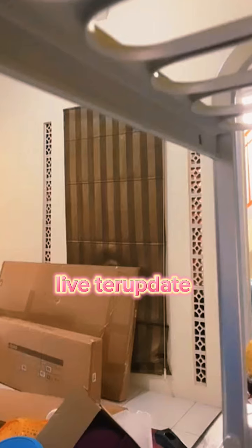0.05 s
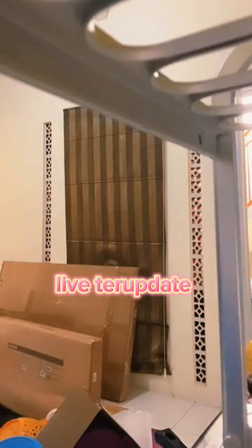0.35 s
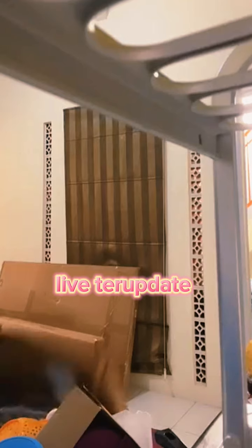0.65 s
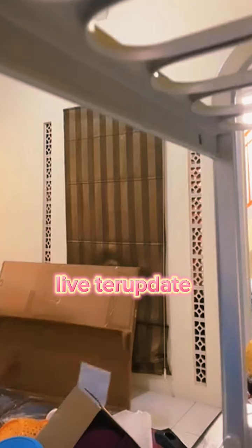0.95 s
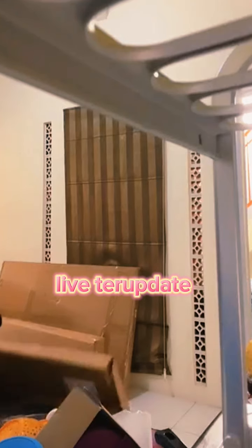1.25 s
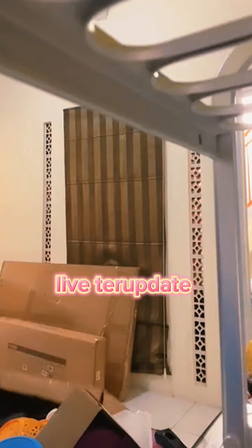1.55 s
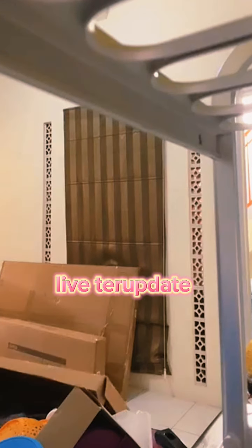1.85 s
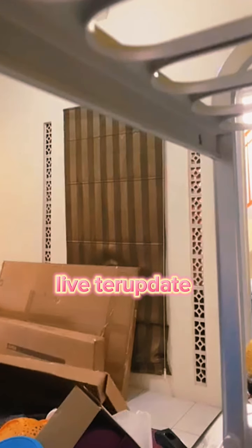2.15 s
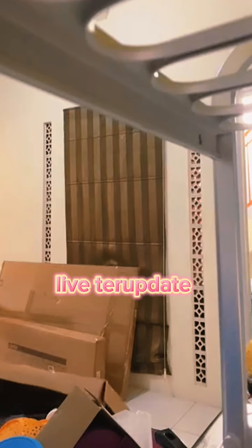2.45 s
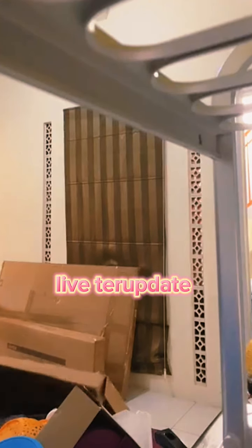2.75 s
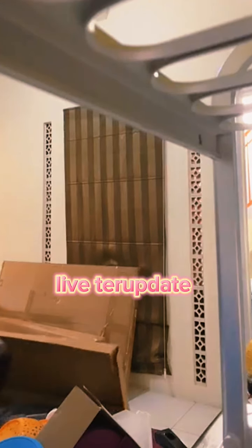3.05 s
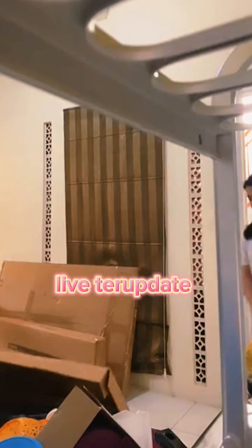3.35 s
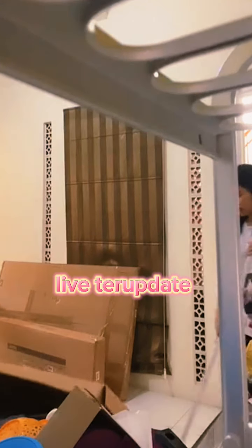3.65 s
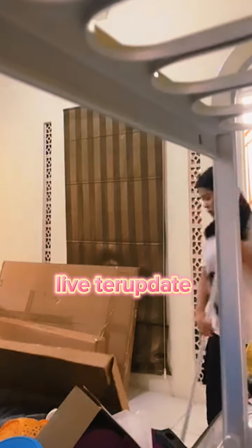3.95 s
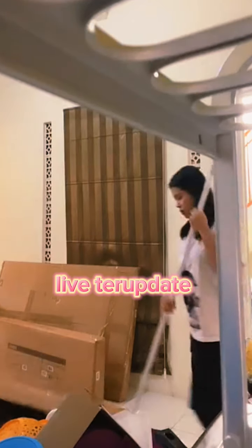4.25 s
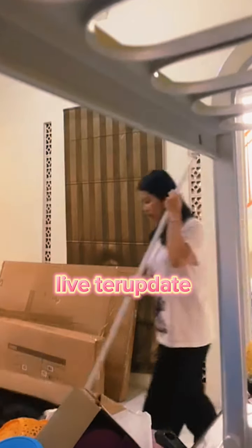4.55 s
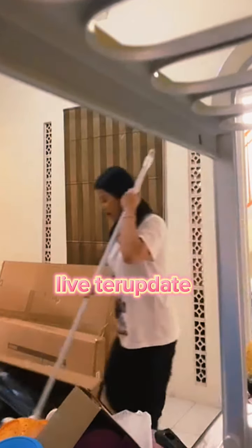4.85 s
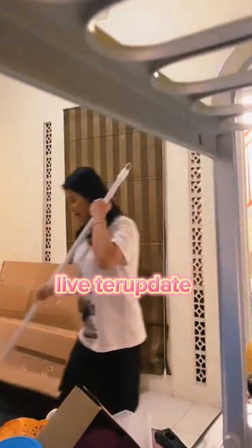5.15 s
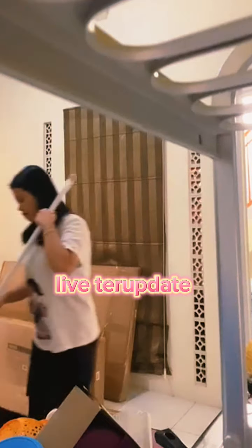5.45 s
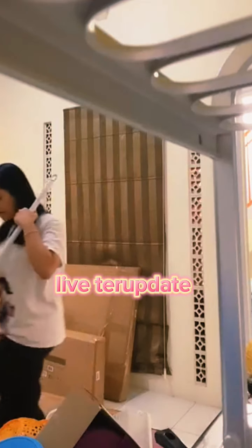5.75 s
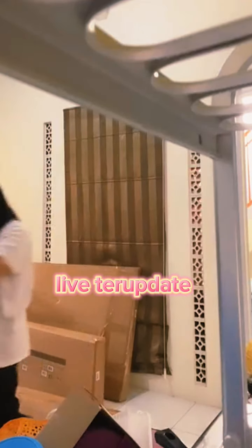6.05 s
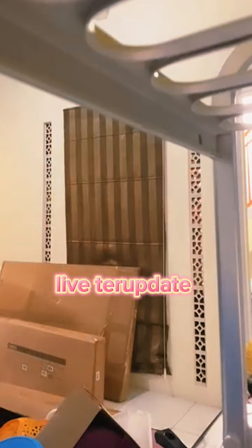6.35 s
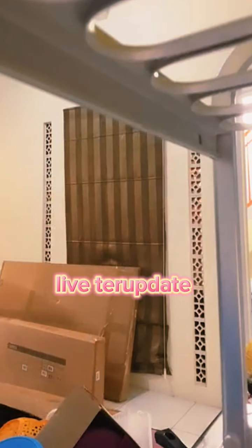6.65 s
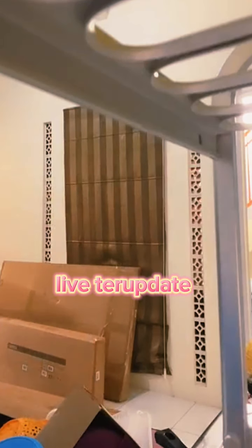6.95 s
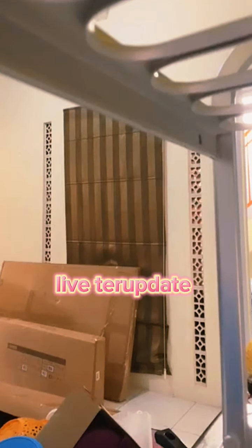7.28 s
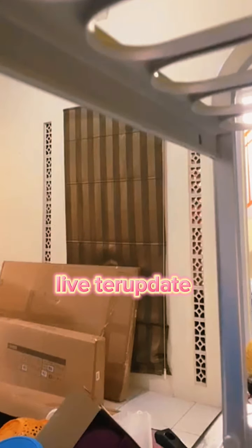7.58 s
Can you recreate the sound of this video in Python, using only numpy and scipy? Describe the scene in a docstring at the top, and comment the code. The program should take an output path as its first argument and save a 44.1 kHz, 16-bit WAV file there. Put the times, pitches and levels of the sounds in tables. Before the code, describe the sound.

Large cardboard boxes are moved around a small, slightly echoing tiled room. A quick clatter of knocks comes early, with an edge juddering briefly across the floor. Scattered knocks follow while plastic wrapping crinkles and snaps, cardboard rubs on cardboard and soft footsteps pass. Another run of knocks comes near the end. A phone a few metres away picks it up over a faint steady hiss.

```python
"""Moving boxes in a tiled room

Large cardboard boxes are tipped, dragged and dropped in a small tiled room. Their panels knock and
flap, and one edge judders over the floor. Plastic wrapping crinkles and snaps as it is pulled about,
cardboard rubs on cardboard, and soft footfalls cross the tiles over a steady hush.
The microphone, a phone a few metres away, hears mostly the room."""
import sys
import numpy as np
from scipy import signal
from scipy.fft import rfft, irfft
from scipy.io import wavfile
from scipy.ndimage import uniform_filter1d

SR = 44100
rng = np.random.default_rng(int(sys.argv[2]) if len(sys.argv) > 2 else 0)


def wav_out(sig):
    """Save sig, one row per channel (or a flat mono array), as 16-bit PCM at SR to the path in sys.argv[1]."""
    wavfile.write(sys.argv[1], SR, np.round(np.clip(np.atleast_2d(sig).T, -1, 1) * 32767).astype(np.int16))


N = 344862
TIME = np.arange(N) / SR


# air pumped inside a box: (frequency [Hz], relative level [dB])
THUMP_SPECTRUM = [(40, -25), (120, -23), (250, -9), (370, 0), (530, 0.5), (700, -9), (3000, -40)]
# blows on the boxes: (time [s], panel level [dB], favoured pitch [Hz], edge crack [dB re panel],
# air thump [dB re panel], settling time [s])
BOX_BLOWS = [(0.065, -26.5, 1540, -1.5, -21, 0.037), (0.791, -26, 1500, 9.5, -14.5, 0.011),
             (0.853, -20.5, 1940, 2, -19, 0.0073), (0.870, -20.5, 1300, -19, -19, 0.02),
             (0.911, -19.5, 1190, 2.5, -15, 0.0093), (0.944, -20, 2140, 0, -26, 0.018),
             (0.981, -23.5, 1500, 6.5, -18.5, 0.012), (1.055, -24.5, 1490, 2.5, -35, 0.0087),
             (1.117, -26, 1580, 5, -24.5, 0.0035), (1.375, -37.5, 836, -7, -16, 0.009),
             (2.024, -19, 1350, -4, -24.5, 0.043), (2.238, -18.5, 1600, 4.5, -27, .017),
             (2.313, -20, 1560, 1, -24, 0.035), (3.004, -36.5, 810, -2, -15, 0.015),
             (4.072, -19.5, 1470, -2.5, -17, 0.023), (4.094, -20.5, 1300, -1.5, -12, 0.012),
             (4.831, -23, 980, -1.5, -22.5, 0.038), (6.519, -16, 1600, 0, -28, 0.015),
             (6.577, -20.5, 1370, -0.5, -30, 0.031), (6.861, -21, 1810, 3.5, -22, 0.0047),
             (6.911, -21.5, 1520, 5, -25, 0.024), (7.263, -21.5, 1327, -10, -26, 0.032),
             (7.463, -27.5, 955, -6, -41, 0.019), (7.568, -28, 1050, -16, -21.5, 0.028)]

def knocks():
    """Each blow rings the panels, cracks at the stiff edge and pumps the air in the box."""
    yield_s = 0.0035   # soft cardboard starts to give before the blow lands
    out, thump = np.zeros(N), response(THUMP_SPECTRUM)
    for start, db, centre_hz, crack_db, thump_db, settle_s in BOX_BLOWS:
        panel = panel_tone(centre_hz, focus_db=28.5)
        crack = edge_crack(crack_db)
        rise_s = min(0.3 * settle_s, 0.0041)
        # the air comes to rest a little later than the cardboard
        for part, part_db, stretch in ((panel, 0, 1), (crack, crack_db, 1), (thump, thump_db, 1.12)):
            force = contact(stretch * settle_s, stretch * rise_s, per_s=4000, weight_s=0.011)
            add(out, start - yield_s, from_db(db + part_db) * through(force, part))
    return out


# resonances of the box panels: (frequency [Hz], width [Hz], relative level [dB])
PANEL_RESONANCES = [(680, 68, -22), (810, 43, 6.5), (935, 110, -3), (1256, 270, 12.5), (1435, 81, 13.5),
                    (1588, 55, 16), (1720, 180, 6.5), (1824, 130, 10.5), (2220, 390, -34), (2260, 180, 16),
                    (2600, 43, -14)]
# overall colour of a panel: (frequency [Hz], relative level [dB])
PANEL_SPECTRUM = [(100, -7), (300, -29), (550, -3), (720, 3), (2500, -0.5), (4000, -24), (9000, -34)]

def panel_tone(centre_hz, focus_db):
    """The hardness of a blow favours the modes round one pitch, by `focus_db` per squared octave."""
    modes = [(hz, width, db - focus_db * np.log2(hz / centre_hz) ** 2)
             for hz, width, db in PANEL_RESONANCES]
    rings = ringing(modes, detune=0.02, uneven_db=2.0)
    return unit_energy(through(rings, response(PANEL_SPECTRUM)))


# a struck box edge: (frequency [Hz], relative level [dB])
CRACK_SPECTRUM = [(1200, -58.5), (2150, -4.5), (3100, 3), (3900, 1.5), (5100, 3.5), (7000, -20),
                  (11000, -29), (15500, -61)]

def edge_crack(crack_db):
    """The stiff edge cracks; a weak crack comes from a soft contact, so it is duller too."""
    treble_db = 0.77 * (crack_db - 4.0)
    edge = response([(hz, db + treble_db * np.clip(np.log2(hz / 3000), 0, 1))
                     for hz, db in CRACK_SPECTRUM])
    return unit_energy(edge + 0.28 * through(edge, folds()))


# a box edge crossing the tiles: (time [s], level [dB])
DRAG_LEVEL = [(0.88, -70), (0.94, -28), (1.0, -23), (1.06, -22), (1.12, -28.5), (1.19, -28.5), (1.25, -35),
              (1.33, -77)]
# resonances of that edge: (frequency [Hz], width [Hz], relative level [dB])
EDGE_RESONANCES = [(1470, 120, -14), (2000, 60, -16), (2200, 48, 9), (2467, 40, 10), (3110, 180, 11),
                   (3690, 80, 4), (4510, 150, 12.5), (5300, 80, -9)]
# its overall colour: (frequency [Hz], relative level [dB])
EDGE_SPECTRUM = [(300, -27), (1000, 6), (5400, 13), (7000, -21), (11000, -32), (15000, -21)]

def drag(slips_per_s=170):
    """The edge sticks and slips on the floor at an unsteady rate, and each slip rings it."""
    slip_rate = slips_per_s * from_db(3.5 * drift(250))
    slips = np.diff(np.floor(np.cumsum(slip_rate) / SR), prepend=0)
    judder = rms_one(slips * from_db(2 * drift(200)))
    force = judder + 0.69 * grains(4000, spread_db=0.5)
    rings = through(force, ringing(EDGE_RESONANCES, detune=0, uneven_db=0))
    return from_db(in_time(DRAG_LEVEL)) * rms_one(through(rings, response(EDGE_SPECTRUM)))


# plastic film: (frequency [Hz], relative level [dB])
FILM_SPECTRUM = [(200, -39.5), (700, -26.5), (2200, -13.5), (3500, -7), (4300, 1), (4950, 2), (5900, -8),
                 (7100, -18), (11000, -26), (15500, -42)]
# pulls on the film: (time [s], length [s], level [dB])
FILM_PULLS = [(0.06, 0.086, -40), (0.32, 0.44, -34), (0.76, 0.29, -28.5), (1.37, 0.11, -39),
              (1.59, 0.31, -34), (1.85, 0.38, -28), (2.0, 0.035, -21.5), (2.3, 0.038, -24.5),
              (2.95, .16, -28.5), (3.12, .23, -27.5), (4.44, 0.12, -39.5), (4.67, 0.066, -34),
              (4.95, 0.26, -32), (5.29, 0.084, -38), (5.48, 0.052, -31.5), (5.7, 0.083, -34.5),
              (5.89, 0.038, -38), (6.16, 0.12, -32.5), (6.42, 0.044, -35), (6.74, .1, -33),
              (6.83, 0.024, -33), (6.9, 0.13, -27), (7.12, .2, -35)]
# the film stirring between pulls: (time [s], level [dB])
FILM_STIRRING = [(0, -45), (0.3, -38), (1.5, -41.5), (2.6, -39.5), (3.45, -38), (3.75, -48), (4.4, -44.5),
                 (4.9, -37.5), (7.1, -40), (7.5, -47), (7.7, -40)]
# its sharp snaps: (time [s], level [dB])
FILM_SNAPS = [(1.593, -29.5), (1.844, -27.5), (1.871, -31), (2.809, -30), (4.699, -30), (4.829, -22),
              (5.542, -31), (6.836, -20)]

def film():
    """Pulled film buckles in clumps of tiny snaps, with a sharper one now and then."""
    stirring_db = in_time(FILM_STIRRING)
    gain = strokes(FILM_PULLS, attack_s=0.026, release_s=0.039, sag_db_per_s=15, rest_db=stirring_db)
    buckles = grains(2600 * from_db(3 * drift(45)), spread_db=1.5)
    crinkle = gain * rustle(buckles, FILM_SPECTRUM, ring=0.45, shifts_per_s=14)
    return crinkle + taps(FILM_SNAPS, FILM_SPECTRUM, settle_s=0.009, weight_s=0.008)


# cardboard sliding on cardboard: (time [s], length [s], level [dB])
BOX_SLIDES = [(0, 0.23, -42), (0.32, 1, -37), (0.79, 0.16, -28), (1.16, 0.045, -41.5), (1.37, 0.05, -43),
              (2.04, 0.14, -33.5), (2.29, 0.12, -32), (2.98, 0.38, -40.5), (4.45, 0.62, -48.5),
              (4.95, 0.63, -42), (6.25, 0.86, -49), (6.74, 0.063, -32)]
# colour of that friction: (frequency [Hz], relative level [dB])
RUB_SPECTRUM = [(100, -41.5), (250, -20), (360, -15.5), (520, -11), (760, 0), (1500, 9), (2300, 0),
                (3500, 3), (6000, -7.5), (15000, -80)]

def rubbing():
    """Sliding cardboard rubs in denser, duller grains than film; the leaning boxes chafe all the time."""
    gain = strokes(BOX_SLIDES, attack_s=0.015, release_s=0.035, sag_db_per_s=1.5, rest_db=-48.5)
    friction = grains(3000 * from_db(3 * drift(30)), spread_db=4.5)
    return gain * rustle(friction, RUB_SPECTRUM, ring=1.0, shifts_per_s=12)


# soft footfalls and nudges: (time [s], level [dB])
FOOTFALLS = [(0.61, -47), (1.199, -49), (1.647, -51), (3.295, -50), (3.713, -47), (3.799, -52),
             (4.732, -51), (5.288, -55), (5.483, -52), (6.107, -54)]
# a foot on the tiles: (frequency [Hz], relative level [dB])
STEP_SPECTRUM = [(60, -37), (180, -21), (340, 5), (480, -1), (900, -20), (3000, -52)]

def footfalls():
    """Feet land softly on the tiles, each a dull cluster of touches."""
    return taps(FOOTFALLS, STEP_SPECTRUM, settle_s=0.03, weight_s=0.0067)


# room tone: (frequency [Hz], relative level [dB])
HUSH_SPECTRUM = [(20, -0.5), (70, -18), (160, -7.5), (350, -3), (600, -7), (850, 2.5), (1500, 12),
                 (2200, -32), (4700, 4), (7000, -27), (15500, -31)]

def hush(level_db=-54):
    """Steady, faint noise fills the room behind the handling."""
    return from_db(level_db) * through(rng.standard_normal(N), response(HUSH_SPECTRUM))


# decay of the small tiled room: (frequency [Hz], time to fall 60 dB [s])
ROOM_DECAY = [(150, 0.52), (400, 0.36), (800, 0.47), (1600, 0.55), (3200, 0.57), (6000, 0.53),
              (14000, 0.63)]

def reverberation(size=32000):
    """Dense wall reflections, dying band by band; energy 1."""
    t, hz = TIME[:size], np.fft.rfftfreq(size, 1 / SR)
    white, out = rfft(rng.standard_normal(size)), 0
    centres, decays = np.transpose(ROOM_DECAY)
    for t60, this_band in zip(decays, np.eye(len(centres))):
        band = irfft(white * at_hz(list(zip(centres, this_band)), hz), size)
        out = out + band * np.exp(-np.log(1000) * t / t60)
    onset = np.clip(t / 0.0012 - 0.5, 0, 1)
    return unit_energy(out * onset)


def room(x, direct_db, side_db):
    """Direct sound arrives centred; reflections shift as the source moves, and differ left and right."""
    walls = wandering(x, reverberation, shifts_per_s=18, count=7)
    direct = from_db(direct_db)
    mid = (direct * x + walls) / np.hypot(1, direct)
    side = from_db(side_db) * through(x, reverberation())
    return np.array([mid + side, mid - side])


def contact(settle_s, rise_s, per_s, weight_s, size=12000):
    """A cluster of touches builds and dies, carrying the energy of `weight_s` seconds at level 1."""
    t = TIME[:size]
    envelope = np.exp(-t / settle_s) * (1 - np.exp(-t / rise_s)) ** 2
    return unit_energy(grains(per_s, spread_db=2.67, size=size) * envelope) * np.sqrt(weight_s * SR)


def taps(rows, spectrum, settle_s, weight_s):
    """Small contacts that share one colour."""
    force = np.zeros(N)
    for start, db in rows:
        add(force, start, from_db(db) * contact(settle_s, rise_s=0.00071, per_s=3000, weight_s=weight_s))
    return through(force, response(spectrum))


def ringing(modes, detune, uneven_db, size=4096):
    """Impulse response of damped modes; pitch and strength depend on where the box is touched."""
    t, out = TIME[:size], 0
    for hz, width, db in modes:
        strength = width * from_db(db + uneven_db * rng.standard_normal())
        pitch = hz * (1 + detune * rng.standard_normal())
        out = out + strength * np.exp(-np.pi * width * t) * np.cos(2 * np.pi * pitch * t)
    return unit_energy(out)


def strokes(rows, attack_s, release_s, sag_db_per_s, rest_db):
    """Gain of hand strokes over a resting level: each builds, sags while it lasts and dies away."""
    power = from_db(rest_db) ** 2
    for start, length, db in rows:
        t = np.maximum(TIME - start, 0)
        attack = np.minimum(t / attack_s, 1)
        release = np.exp(-np.clip((t - length) / release_s, 0, 20))
        level = from_db(db - sag_db_per_s * np.minimum(t, length))
        power = power + (attack * release * level) ** 2
    return np.sqrt(power)


def rustle(force, spectrum, ring, shifts_per_s):
    """Grains excite a sheet whose resonances shift as it bends; rms near 1 over each tenth of a second."""
    resonant = wandering(force, folds, shifts_per_s, count=10)
    sound = through(force + ring * resonant, response(spectrum))
    return sound / np.sqrt(uniform_filter1d(sound ** 2, size=SR // 10) + 1e-12)


def folds(decay_s=0.0014, size=1024):
    """The many short, broad resonances of a creased sheet; energy 1."""
    age = TIME[:size] / decay_s
    return unit_energy(rng.standard_normal(size) * np.sqrt(age) * np.exp(-age))


def grains(per_s, spread_db, size=N):
    """Random tiny slips of uneven strength; rms 1."""
    strength = from_db(spread_db * np.minimum(rng.exponential(1, size), 4))
    sign = rng.choice([-1, 1], size)
    slipping = rng.random(size) < per_s / SR
    return rms_one(strength * sign * slipping)


def wandering(x, make_response, shifts_per_s, count):
    """A moving source passes from one random response to the next at even power."""
    shares = np.array([drift(shifts_per_s) for _ in range(count)])
    shares = shares / np.linalg.norm(shares, axis=0)
    return sum(through(x * share, make_response()) for share in shares)


def drift(per_s):
    """A curve gliding between random values of spread 1, `per_s` of them a second (up to 400)."""
    knots = rng.standard_normal(int(N / SR * 400))
    return np.interp(TIME * per_s, np.arange(len(knots)), knots)


def response(spectrum, size=4096):
    """Causal (minimum-phase) impulse response with this spectrum; energy 1."""
    magnitude = from_db(at_hz(spectrum, np.fft.rfftfreq(size, 1 / SR)))
    cepstrum = irfft(np.log(magnitude))
    cepstrum[1:size // 2] *= 2
    cepstrum[size // 2 + 1:] = 0
    return unit_energy(irfft(np.exp(rfft(cepstrum))))


def through(x, impulse):
    """Pass a signal through an impulse response."""
    return signal.fftconvolve(x, impulse)[:len(x)]


def add(track, start_s, sound):
    """Mix a sound into a track."""
    start = max(int(start_s * SR), 0)
    track[start:start + len(sound)] += sound[:N - start]


def in_time(points):
    """Read a (time, value) table at every sample."""
    return np.interp(TIME, *np.transpose(points))


def at_hz(points, hz):
    """Read a (frequency, value) table on a log-frequency axis."""
    frequencies, values = np.transpose(points)
    return np.interp(np.log(np.maximum(hz, 1)), np.log(frequencies), values)


def from_db(db):
    """Decibels to gain."""
    return 10 ** (np.asarray(db) / 20)


def rms_one(x):
    """Scale to rms 1."""
    return x / np.sqrt(np.mean(x ** 2) + 1e-20)


def unit_energy(x):
    """Scale so that the squares sum to 1."""
    return x / np.sqrt(np.sum(x ** 2) + 1e-20)


def scene():
    """Boxes, wrapping and feet over a steady hush, heard from a few metres across the room."""
    bumps = room(knocks() + drag() + footfalls(), direct_db=-1.0, side_db=-18.5)
    rustles = room(hush() + rubbing() + film(), direct_db=0.5, side_db=-16.5)
    return bumps + rustles


# colour of the phone's microphone and its port: (frequency [Hz], width [Hz], gain [dB])
MICROPHONE_BANDS = [(366, 28, 4.5), (434, 23, -4.5), (796, 278, 9), (1082, 104, -11), (4600, 1400, 1),
                    (9170, 1260, -7), (10320, 1200, 4)]
CUTOFF_HZ = 15700

def record(dry):
    """The phone's microphone port adds peaks and notches; the top is cut."""
    out = dry
    for hz, width, db in MICROPHONE_BANDS:
        angle, height = 2 * np.pi * hz / SR, from_db(db / 2)
        damp = np.sin(angle) * width / (2 * hz)
        feedforward = [1 + damp * height, -2 * np.cos(angle), 1 - damp * height]
        feedback = [1 + damp / height, -2 * np.cos(angle), 1 - damp / height]
        out = signal.lfilter(feedforward, feedback, out)
    lowpass = signal.ellip(12, 0.1, 80, CUTOFF_HZ, fs=SR, output="sos")
    return signal.sosfilt(lowpass, out)


dry = scene()
out = record(dry)
wav_out(out)
```